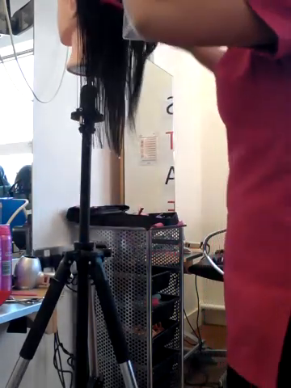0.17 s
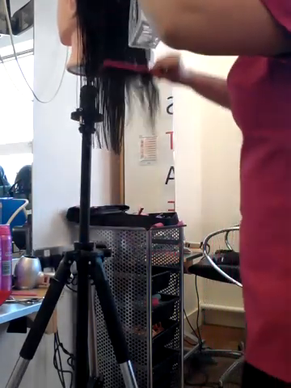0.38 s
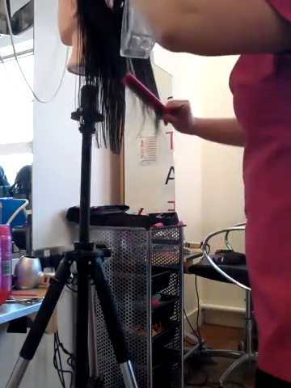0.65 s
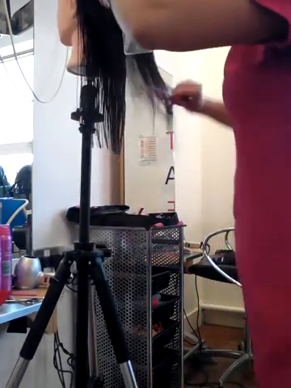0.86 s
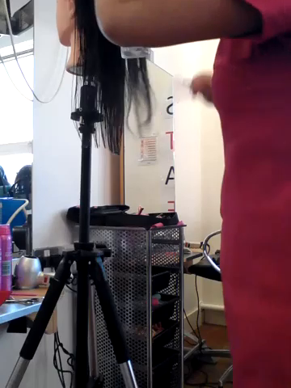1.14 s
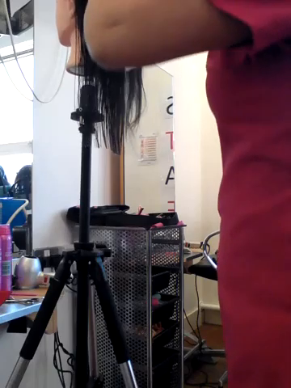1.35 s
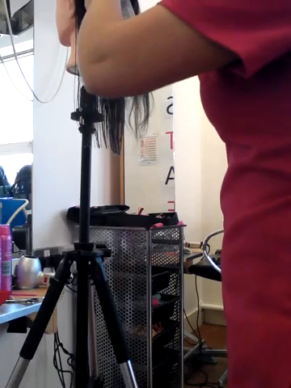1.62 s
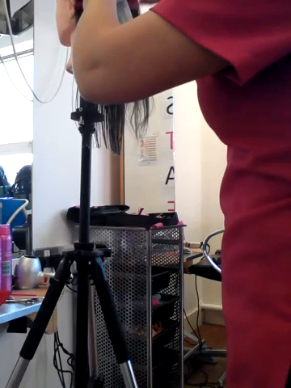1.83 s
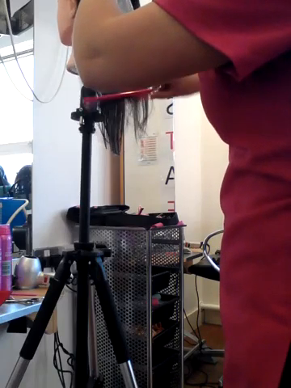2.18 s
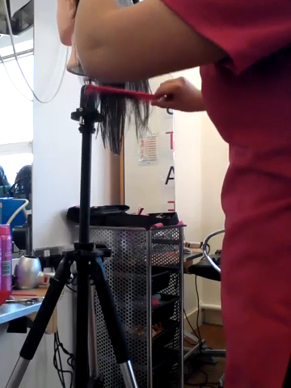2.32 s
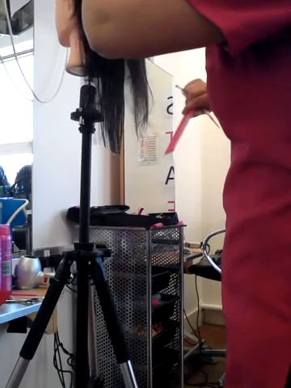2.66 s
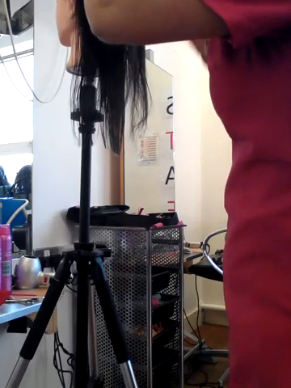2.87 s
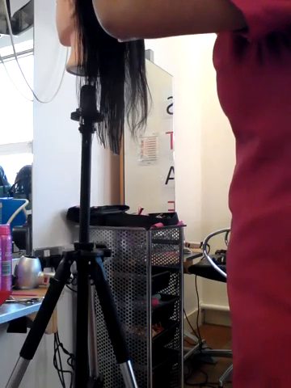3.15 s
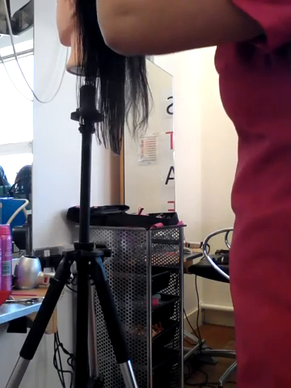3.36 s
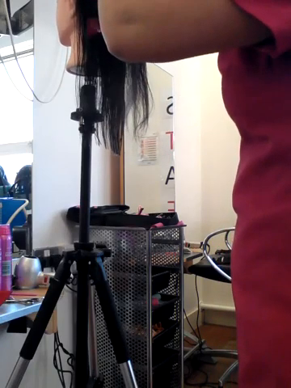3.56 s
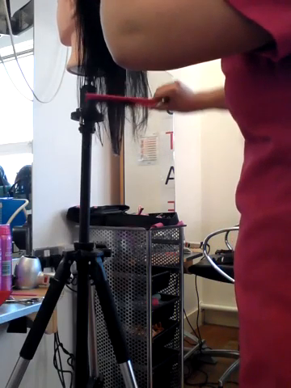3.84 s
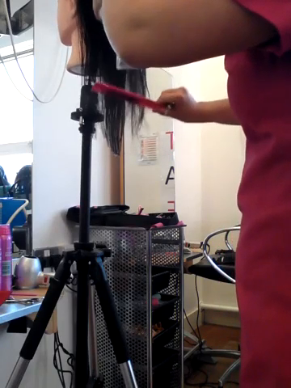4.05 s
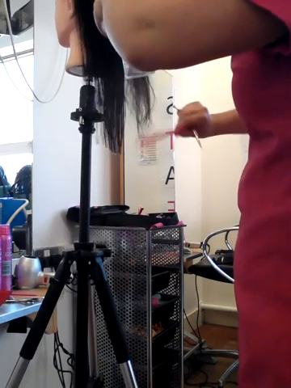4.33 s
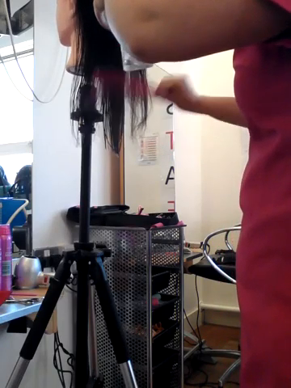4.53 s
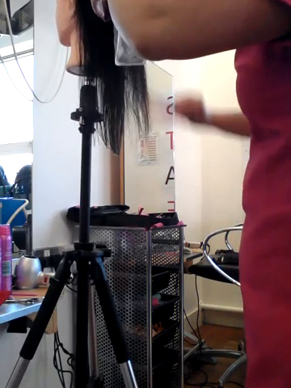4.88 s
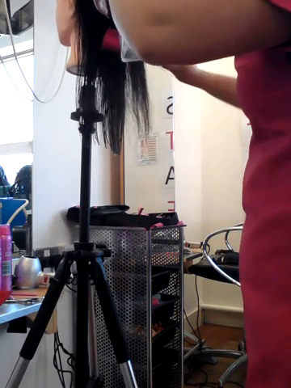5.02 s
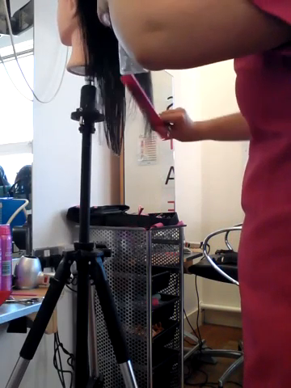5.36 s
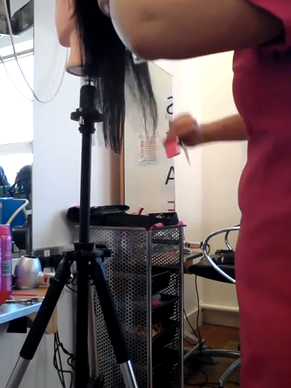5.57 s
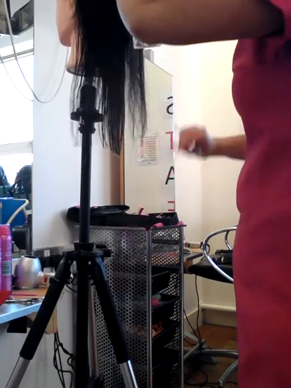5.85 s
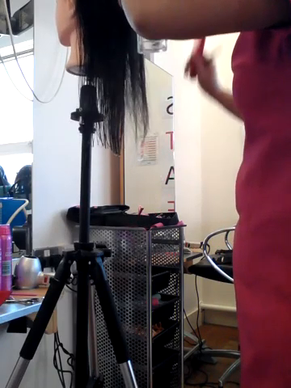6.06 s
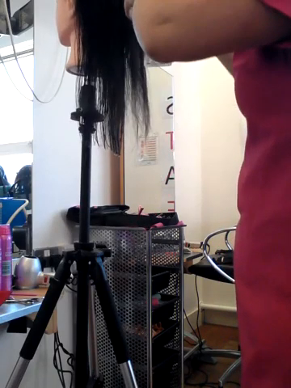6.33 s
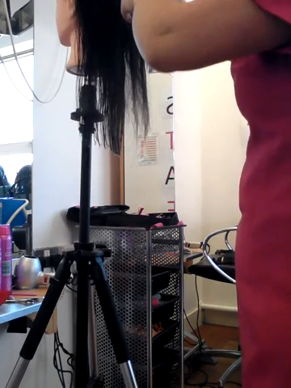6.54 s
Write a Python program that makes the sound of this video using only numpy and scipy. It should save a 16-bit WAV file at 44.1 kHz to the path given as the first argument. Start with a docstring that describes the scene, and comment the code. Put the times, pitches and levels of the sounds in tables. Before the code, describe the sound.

In a hard-walled classroom, a tap-like hiss runs over a low room rumble. A trigger spray bottle gives three short wet squirts, pauses, then three more with small plastic ticks. Dull thuds sound further off, then a loud hard clack with fluttering echoes and a softer clack. Four last squirts follow. One small microphone with faint noise of its own.

```python
"""First comes a tap-like hiss over a rumbling room, strong at the start and wavering later: shaped noise.
Soon a trigger spray bottle wets long hair in a hard-walled classroom, three or four squirts at a time.
The squirts are bursts of jet noise; small trigger ticks are short clicks ringing like hard plastic.
Further off, something set down gives dull thuds of low noise, and a hard object clacks twice, with
quick flutter echoes after the first loud clack. One small microphone adds its own noise, and decaying
noise patterns make the room's echoes."""
import sys
import numpy as np
from scipy import signal
from scipy.fft import rfft, irfft
from scipy.io import wavfile

SR = 44100
rng = np.random.default_rng(int(sys.argv[2]) if len(sys.argv) > 2 else 0)


def wav_record(signal):
    """Record a signal, one row per channel, as 16-bit PCM in the file named by sys.argv[1]."""
    frames = np.transpose(np.atleast_2d(signal))
    bounded = np.clip(frames, -1, 1)
    # unit amplitude maps onto the largest positive 16-bit level
    quanta = np.round(bounded * 32767).astype(np.int16)
    wavfile.write(sys.argv[1], SR, quanta)


N = 295469
T = np.arange(N) / SR
HZ = np.maximum(np.arange(N // 2 + 1) * SR / N, 5)   # kept above 0 for the log axis


def from_db(db):
    """Turns decibels into gain."""
    return 10 ** (np.asarray(db) / 20)


def rms_one(x):
    """Scales a sound to an rms of 1."""
    return x / np.sqrt(np.mean(x ** 2) + 1e-20)


def at_hz(points, hz):
    """Reads a curve of (frequency [Hz], level [dB]) on a log-frequency axis."""
    points_hz, points_db = np.transpose(points)
    return np.interp(np.log(hz), np.log(points_hz), points_db)


def band(x, low_hz, high_hz):
    """Lets through only one band of pitches: a second-order band-pass."""
    edges = [low_hz, min(high_hz, .45 * SR)]
    return signal.sosfilt(signal.butter(2, edges, "band", fs=SR, output="sos"), x)


def noise(gain):
    """Makes random noise with the given gain at each frequency; rms 1."""
    return rms_one(irfft(rfft(rng.standard_normal(N)) * gain, N))


def drift(rate):
    """Makes a random wander, smoothed so that it is weak above about rate [Hz]; rms 1."""
    step = 40   # samples between computed points
    pole = np.exp(-2 * np.pi * rate * step / SR)
    steps = rng.standard_normal(N // step + 2002)
    slow = signal.lfilter([1], [1, -2 * pole, pole * pole], steps)[2000:]   # skip the filter's start
    return np.interp(np.arange(N) / step, np.arange(len(slow)), rms_one(slow))


def patchy(spectrum, patchy_db, rate):
    """Makes coloured noise whose octaves flicker partly together, partly alone; rms 1."""
    together = drift(rate)
    colour = from_db(at_hz(spectrum, HZ))
    out = 0
    for centre in 30 * 2.0 ** np.arange(10):
        octave = np.cos(np.clip(np.log2(HZ / centre), -1, 1) * np.pi / 2) * colour
        flicker_db = patchy_db * (2.0 * together + drift(rate))
        out = out + irfft(rfft(rng.standard_normal(N)) * octave, N) * from_db(flicker_db)
    return rms_one(out)


def burst(swell, t60):
    """Shapes a level that swells smoothly to 1, then dies by 60 dB in t60 seconds."""
    swell, t60 = max(swell, 2e-4), max(t60, 2e-3)
    t = np.arange(int((swell + t60) * SR)) / SR
    rising = np.sin(np.pi / 2 * np.minimum(t / swell, 1)) ** 2
    return np.where(t < swell, rising, from_db(-60 * (t - swell) / t60))


def add(out, s, sound):
    """Mixes a sound in at time s [s]."""
    i = int(s * SR)
    out[i:i + len(sound)] += sound[:N - i]


# How long echoes take to die by 60 dB: (frequency [Hz], time [s])
ECHO_T60 = [(200, 0.61), (1400, 0.81), (3700, 0.93), (6000, 0.42), (8500, 0.21), (12000, 0.2)]
# How strongly echoes start: (frequency [Hz], level [dB])
ECHO_COLOUR = [(150, 11), (1400, 5.5), (2600, 2), (3700, 2), (5500, 9), (8000, 8), (14000, -10)]


def room():
    """Gives echo patterns: noise that builds up fast and dies at its own speed in each band."""
    t = T[:SR]
    centres = 60 * 2.0 ** np.arange(0, 8, .5)
    bands = []
    for hz in centres:
        half_octave = signal.butter(2, [hz, hz * np.sqrt(2)], "band", fs=SR, output="sos")
        bands.append(signal.sosfilt(half_octave, rng.standard_normal(2 * SR)))
    bands = np.array(bands)
    start_db = at_hz(ECHO_COLOUR, centres)[:, None]
    dying = from_db(start_db - 60 * t / at_hz(ECHO_T60, centres)[:, None])
    dying = dying * np.clip((t - .004) / 0.00043, 0, 1)   # the nearest wall answers after a few ms

    def echo():
        """Gives the pattern heard from another spot, by reading the noise from a random point."""
        tail = np.sum(bands[:, rng.integers(SR):][:, :SR] * dying, axis=0)
        return tail / np.sqrt(np.sum(tail ** 2))   # unit energy
    return echo


# Faint low hums: (start [s], end [s], first pitch [Hz], last pitch [Hz], middle rms level [dB])
HUM_GLIDES = [(4.2, 4.62, 212, 216, -53), (4.58, 5.25, 201, 204, -49.5), (4.25, 4.86, 260, 277, -52.5),
              (4.94, 5.5, 294, 301, -53), (4.943, 5.948, 169, 165, -55), (5.33, 5.9, 243, 248, -53),
              (4.4, 4.85, 605, 592, -58), (4.95, 5.3, 482, 492, -57), (5.7, 6.12, 482, 490, -57),
              (5.55, 5.95, 550, 552, -58)]


def hums():
    """Unsteady low sine tones that fade in, glide a little and fade out."""
    out = np.zeros(N)
    for start, end, first_hz, last_hz, db in HUM_GLIDES:
        along = np.clip((T - start) / (end - start), 0, 1)
        pitch = first_hz + (last_hz - first_hz) * along + .6 * drift(2)
        fade = np.sqrt(2 * np.minimum(2 * np.sin(np.pi * along), 1))
        tone = np.sin(2 * np.pi * np.cumsum(pitch) / SR)
        out += from_db(db + 0.49 * drift(3.7)) * fade * tone
    return out


# Background levels before the low cut: (time [s], hiss [dB], murmur of the room [dB], drone [dB])
BACKGROUND_LEVELS = [(0, -43.5, -51, -60), (.06, -40, -48, -64), (.23, -43, -52, -55),
                     (.39, -43, -51.5, -63), (.65, -41, -49, -60), (.78, -41.5, -49, -54),
                     (.88, -43.5, -50, -58), (1.1, -42, -51, -62.5), (1.5, -48.5, -51.5, -61.5),
                     (1.69, -49.5, -53.5, -58), (1.749, -64, -53.5, -62), (2.328, -56, -53, -56.5),
                     (2.95, -43.5, -47.5, -53), (3.26, -50.5, -48.5, -53.5), (3.5, -50.5, -44.5, -38),
                     (3.68, -56.5, -45, -44), (3.95, -63.5, -50, -50.5), (4.2, -64, -41.5, -49),
                     (4.6, -56.5, -50.5, -49.5), (5.06, -52, -47, -46), (5.3, -61, -47.5, -48),
                     (5.65, -48.5, -47, -48.5), (6.25, -48, -48, -50), (6.7, -44.5, -49, -49)]
# Colour of the far hiss: (frequency [Hz], level [dB per Hz])
HISS_COLOUR = [(710, -22), (1200, -11), (1610, -2.5), (2100, -4.5), (2360, 0), (3340, -1), (4220, 7.5),
               (5730, -4.5), (8000, -10.5), (13400, -23), (15000, -47)]
# Colour of the room's murmur: (frequency [Hz], level [dB per Hz])
MURMUR_COLOUR = [(150, -11.5), (250, -7), (301, -6), (425, -7.5), (467, -6.5), (599, -5.5), (1010, -12.5),
                 (1460, -11.5), (3000, -26), (3900, -24), (6600, -120)]
# Colour of the drone before its peaks: (frequency [Hz], level [dB per Hz])
DRONE_COLOUR = [(74, -51), (125, -1), (153, 0), (204, -0.5), (242, 3.5), (286, -9), (329, -2), (400, -9.5),
                (520, -38), (880, -120)]
# Room modes added to the drone: (frequency [Hz], width [Hz], level [dB])
DRONE_MODES = [(162, 39, -3.5), (206.3, 17, 3.5), (262, 33, -20), (360, 22, -3)]
# Deepest rumble: (time [s], level [dB])
DEEP_LEVELS = [(0, -98), (.6, -92), (.75, -80), (.95, -95), (2.0, -92), (2.2, -76), (2.6, -92), (2.87, -80),
               (3.2, -92), (3.5, -78), (4.2, -73), (5.4, -67), (6.7, -74)]
# Colour of the microphone's own noise: (frequency [Hz], level [dB per Hz])
SELF_NOISE_COLOUR = [(20, 17), (40, -23), (65, -30), (110, -30), (300, -28), (8000, 0.5), (15000, -1.5)]
SELF_NOISE_DB = -64.5   # overall rms


def background():
    """Shaped noises make far hiss, murmur, drone and microphone noise; hums swell later on."""
    s, hiss_db, murmur_db, drone_db = np.transpose(BACKGROUND_LEVELS)
    hiss = from_db(np.interp(T, s, hiss_db)) * patchy(HISS_COLOUR, patchy_db=.6, rate=12)
    murmur = from_db(np.interp(T, s, murmur_db)) * patchy(MURMUR_COLOUR, patchy_db=.8, rate=5.0)
    modes = 1 + sum(from_db(db) / (1 + ((HZ - hz) / width * 2) ** 2) for hz, width, db in DRONE_MODES)
    drone_gain = from_db(np.interp(T, s, drone_db) + 0.2 * drift(3.2))
    drone = drone_gain * noise(from_db(at_hz(DRONE_COLOUR, HZ)) * modes)
    low_noise = band(band(rng.standard_normal(N), 65, 116), 65, 116)
    deep = from_db(np.interp(T, *np.transpose(DEEP_LEVELS))) * rms_one(low_noise)
    own_noise = from_db(SELF_NOISE_DB) * noise(from_db(at_hz(SELF_NOISE_COLOUR, HZ)))
    low_cut = band(band(hiss + murmur + drone, 170, 20000), 170, 20000)
    return low_cut + hums() + deep + own_noise


# Dull far thuds: (time [s], boom [dB], body [dB], rustle [dB], t60 before the parts' shares [s],
# centre of the body [Hz])
FAR_THUDS = [(2.016, -42.5, -42, -51, 0.64, 940), (2.356, -50, -71, -80, 0.63, 900),
             (2.556, -52, -56, -70, 0.096, 900), (2.634, -54.5, -70, -64, 1, 900),
             (2.916, -41.5, -40.5, -67, 0.5, 940), (3.010, -46, -46, -50, 0.11, 1100),
             (3.416, -47.5, -43.5, -43.5, 0.63, 1190), (3.453, -39.5, -30, -37, 0.58, 1280),
             (3.480, -40.5, -39.5, -52, 0.4, 754), (3.521, -38.5, -37.5, -57, 0.32, 1170),
             (3.999, -36.5, -33.5, -44, 0.63, 970), (4.018, -44.5, -38, -48, 0.33, 700),
             (4.055, -44, -39, -41.5, 0.55, 905), (4.389, -52, -48, -59, 0.22, 1010)]
# Boom, body and rustle of a thud, one row each: (delay [s], swell [s], share of the t60 [ratio])
BOOM_BODY_RUSTLE = [(0.00803, 0.015, 0.75), (0.000996, 0.0019, 1.06), (0.0017, 0.019, 1.8)]
BOOM_HZ, RUSTLE_HZ = (183, 615), (1930, 4660)
BODY_SPREAD = 1.48   # the body reaches this factor below and above its centre
THUD_LUMPS_DB, THUD_LUMPS_HZ = 2.0, 45   # a thud comes down unevenly


def thuds():
    """Soft heavy contacts: a late boom, a body and a rustle, each noise with a weak skirt above."""
    out = np.zeros(N)
    for s, *levels_db, t60, body_hz in FAR_THUDS:
        edges = BOOM_HZ, (body_hz / BODY_SPREAD, body_hz * BODY_SPREAD), RUSTLE_HZ
        for db, (low_hz, high_hz), (delay, swell, share) in zip(levels_db, edges, BOOM_BODY_RUSTLE):
            white = rng.standard_normal(SR)
            skirt = from_db(-22) * rms_one(band(white, high_hz, high_hz + 3000))
            shudder = rms_one(band(white, low_hz, high_hz)) + skirt
            shape = burst(swell, min(share * t60, .7))
            add(out, s + delay, from_db(db) * shape * shudder[SR // 10:][:len(shape)])
    return out * from_db(THUD_LUMPS_DB * drift(THUD_LUMPS_HZ))


# Ticks and clacks of hard plastic, with quick flutter echoes after the first loud clack,
# before the microphone's colour: (time [s], level at the onset [dB], low edge [Hz], high edge [Hz])
CLACKS_AND_FLUTTER = [(0.826, -39, 900, 9000), (2.373, -37, 3000, 14000), (2.689, -36, 3020, 13900),
                      (3.355, -29, 3560, 12100), (4.1455, -27, 497, 6400), (4.8859, -12.5, 1400, 9000),
                      (4.8874, -10.5, 3400, 5200), (4.890, -18, 2100, 3000), (4.8945, -21, 900, 6000),
                      (4.9008, -21, 3200, 4760), (4.9022, -23, 2500, 5000), (4.909, -26, 3000, 4800),
                      (4.921, -25, 1200, 4800), (4.928, -27, 3000, 4800), (4.934, -27, 3400, 4500),
                      (5.4208, -38, 3400, 5500), (5.4256, -25, 600, 9000), (5.4264, -22, 1500, 3100),
                      (5.4276, -22, 1300, 2200), (5.434, -25, 1600, 3200), (5.441, -29, 1300, 3200),
                      (5.728, -36.5, 1490, 8000), (6.598, -32, 1520, 14300)]
# Modes of the struck plastic: (frequency [Hz], level before the ringing gain [dB], t60 [s])
PLASTIC_MODES = [(700, -2, .04), (1050, -6, .03), (1530, 2, .05), (2030, 1, .05), (2450, 2, .05),
                 (2750, 0, .05), (3330, 0, .045), (3790, -2, .04), (3960, 1, .045), (4400, 0, .035),
                 (4810, -4, .035)]
RING_DB, RATTLE_DB, RATTLE_T60_S = -42, -21, 0.03   # ringing and rattle, against the bare crack
CLACK_WET_DB = -8   # level of the room echo of each row
ECHO_WIDER = 1.03   # that echo's band is this factor wider at each edge


def clacks(echo):
    """A sharp crack and brief rattle ring the plastic's modes; each row, clack or flutter, is band-passed."""
    out, t = np.zeros(N), T[:SR // 8]
    ringing = np.zeros(len(t))
    for hz, db, t60 in PLASTIC_MODES:
        ringing += from_db(RING_DB + db - 60 * t / t60) * np.sin(2 * np.pi * hz * t)
    ringing[0] = 1   # the bare crack
    click = 1. * (t == 0)
    shape = burst(.001, RATTLE_T60_S)
    energy = np.sum(shape ** 2)
    for s, db, low_hz, high_hz in CLACKS_AND_FLUTTER:
        force = from_db(RATTLE_DB) * rng.standard_normal(len(shape)) * shape
        force[SR // 2000] += 1   # the crack, half a millisecond in
        rung = band(signal.fftconvolve(force, ringing), low_hz, high_hz)
        add(out, s, from_db(db) * rung * np.sqrt(energy / np.sum(rung ** 2)))
        edges = low_hz / ECHO_WIDER, high_hz * ECHO_WIDER
        strength = np.sqrt(energy / np.sum(band(click, *edges) ** 2))
        add(out, s, from_db(db + CLACK_WET_DB) * strength * band(echo(), *edges))
    return out


# Brief whistles of the nozzle: (time [s], pitch [Hz], rms level at the top of the swell [dB])
NOZZLE_WHISTLES = [(1.000, 5940, -32), (1.287, 7400, -30), (1.305, 3830, -25), (2.417, 5640, -30),
                   (2.437, 5430, -28.5), (2.448, 4700, -29.5), (2.754, 5630, -42), (3.089, 6560, -36),
                   (5.566, 4370, -30), (5.598, 4300, -33), (5.615, 4600, -33), (5.885, 5240, -31.5),
                   (6.182, 5250, -29), (6.189, 4280, -29), (6.206, 6300, -33), (6.212, 4050, -34)]
WHISTLE_WIDTH = 0.13   # share of the pitch
WHISTLE_SWELL_S, WHISTLE_T60_S = 0.0057, 0.1


def whistles():
    """Narrow noise where the jet briefly sings at one pitch."""
    out, shape = np.zeros(N), burst(WHISTLE_SWELL_S, WHISTLE_T60_S)
    for s, hz, db in NOZZLE_WHISTLES:
        half = hz * WHISTLE_WIDTH / 2
        narrow = rms_one(band(rng.standard_normal(SR // 2), hz - half, hz + half))
        add(out, s, from_db(db) * shape * narrow[:len(shape)])
    return out


# Pulls of the trigger: (valve opens [s], seep before it [s], build-up to the surge [s], seep [dB],
# jet [dB], surge [dB], treble over body before each stage's offset [dB],
# pump whistle over body in the surge [dB])
TRIGGER_PULLS = [(0.926, 0.021, 0.079, -46, -38, -32, -8.5, -8),
                 (1.245, 0.011, 0.06, -40, -34, -32, -8, -11),
                 (1.497, 0.019, 0.036, -48, -43, -38, -2.5, -7),
                 (2.403, .03, 0.051, -71.5, -35.5, -31, -6.5, 1),
                 (2.754, 0.07, 0.075, -38.5, -33.5, -42.5, -2.5, -3.5),
                 (3.084, 0.082, .026, -41.5, -32.5, -48, -5.5, -16),
                 (5.561, 0.113, 0.059, -41.5, -33, -38.5, -8, -3),
                 (5.878, 0.063, 0.025, -39.5, -33, -40, 0, 6),
                 (6.175, 0.086, 0.038, -41, -31.5, -36.5, -3.5, -7),
                 (6.358, 0.023, 0.074, -48, -39, -33.5, -7.5, -15)]
# Air bubbles spitting through the nozzle in short pops: (time [s], peak level [dB])
BUBBLE_SPITS = [(0.942, -36), (0.969, -34), (1.017, -31), (1.308, -32), (1.498, -38), (1.525, -43),
                (1.549, -34), (1.565, -35), (1.579, -33), (2.405, -39), (2.448, -34), (2.755, -32),
                (2.802, -29), (3.074, -34.5), (3.113, -30.5), (5.599, -33), (5.887, -34.5), (5.896, -34),
                (6.179, -33), (6.217, -30.5), (6.424, -47)]
# Stray drops between pulls: (time [s], peak level [dB])
STRAY_DROPS = [(1.600, -40.5), (1.671, -58), (1.799, -50.5), (1.865, -54.5), (2.278, -52), (2.970, -45)]
SEEP_START_DB = -3   # a seep's first burst, against its top
SEEP_T60_S, SEEP_TREBLE_DB = 0.14, -3.5
JET_SWELL_S, JET_T60_S, JET_TREBLE_DB = 0.0073, 0.22, 2
SURGE_SWELL_S, SURGE_T60_S, SURGE_TREBLE_DB = 0.062, 0.23, 2   # longest swell of a surge
EARLY_WHISTLE_DB = -7   # the pump whistles less before the surge
SPIT_SWELL_S, SPIT_T60_S, SPIT_TREBLE_DB = 0.0029, 0.042, -4.5
DRIBBLE_T60_S, DRIBBLE_TREBLE_DB = 0.36, -7.5


def spurts():
    """A pull seeps, opens and surges; spits and drops follow their own lists.

    Rows: (time [s], peak [dB], swell [s], t60 [s], treble over body [dB], whistle over body [dB])."""
    for s, seep, build, seep_db, jet_db, surge_db, treble_db, whistle_db in TRIGGER_PULLS:
        swell = min(build, SURGE_SWELL_S)
        early_db = whistle_db + EARLY_WHISTLE_DB
        seep_treble_db = treble_db + SEEP_TREBLE_DB
        yield s - seep, seep_db + SEEP_START_DB, JET_SWELL_S, SEEP_T60_S, seep_treble_db, early_db
        yield s - seep, seep_db, seep, SEEP_T60_S, seep_treble_db, early_db
        yield s, jet_db, JET_SWELL_S, JET_T60_S, treble_db + JET_TREBLE_DB, early_db
        yield s + build - swell, surge_db, swell, SURGE_T60_S, treble_db + SURGE_TREBLE_DB, whistle_db
    for s, db in BUBBLE_SPITS:
        yield s - SPIT_SWELL_S / 2, db, SPIT_SWELL_S, SPIT_T60_S, SPIT_TREBLE_DB, -15
    for s, db in STRAY_DROPS:
        yield s, db, JET_SWELL_S, DRIBBLE_T60_S, DRIBBLE_TREBLE_DB, -15


# Colour of the spray jet: (frequency [Hz], level [dB per Hz])
JET_COLOUR = [(700, -26), (1200, -14), (2000, -9.5), (3000, -6.5), (3800, 1), (4600, 2.5), (5600, -3),
              (7000, -5.5), (10000, -10), (15000, -14)]
TREBLE_HZ = 6400   # body below, treble above
PUMP_HZ, PUMP_WIDTH_HZ = 2340, 320
SPUTTER_DB, SPUTTER_HZ = 1.0, 35   # air in the tube makes the whole jet stutter
GRAIN_DB, GRAIN_HZ = 1.6, 200   # droplets make each part grainy


def spray():
    """Turbulent jet noise in three parts: body, fizzing treble and the pump's whistle."""
    colour = from_db(at_hz(JET_COLOUR, HZ))
    body_noise = noise(colour / np.sqrt(1 + (HZ / TREBLE_HZ) ** 6))
    treble_noise = noise(colour / np.sqrt(1 + (TREBLE_HZ / HZ) ** 6))
    pump_noise = noise(1 / (1 + ((HZ - PUMP_HZ) / PUMP_WIDTH_HZ * 2) ** 2))
    body_power, treble_power, pump_power = np.zeros((3, N))
    for s, db, swell, t60, treble_db, whistle_db in spurts():   # overlapping spurts add in power
        add(body_power, s, (from_db(db) * burst(swell, t60)) ** 2)
        add(treble_power, s, (from_db(db + treble_db) * burst(swell, 1.66 * t60)) ** 2)
        add(pump_power, s + swell / 2, (from_db(db + whistle_db) * burst(swell / 2, t60 / 4)) ** 2)
    stutter = from_db(SPUTTER_DB * drift(SPUTTER_HZ))

    def play(power, part):
        """Gives a noise its changing level, stutter and droplet grain."""
        return stutter * from_db(GRAIN_DB * drift(GRAIN_HZ)) * np.sqrt(power) * part
    jet = play(body_power, body_noise) + play(treble_power, treble_noise)
    return jet, play(pump_power, pump_noise)


# The microphone's colour for blows and echoes: (frequency [Hz], level [dB])
MICROPHONE_COLOUR = [(20, -30), (100, -13), (160, 3.5), (250, 8), (1500, 2), (2900, 1), (3950, 2),
                     (4900, -1.5), (5500, -2.5), (8000, -11), (15000, -19)]
SPRAY_WET_DB, PUMP_WET_DB, THUD_WET_DB = -8, -17, -13   # how much of each feeds the echoes


def scene():
    """Mixes all sources at one microphone and feeds both channels the same sound."""
    echo = room()
    soft = thuds()
    jet, pump = spray()
    jet = jet + whistles()
    sent = from_db(THUD_WET_DB) * soft + from_db(SPRAY_WET_DB) * jet + from_db(PUMP_WET_DB) * pump
    echoes = signal.fftconvolve(sent, echo())[:N]
    blows_and_echoes = clacks(echo) + soft + echoes
    coloured = irfft(rfft(blows_and_echoes) * from_db(at_hz(MICROPHONE_COLOUR, HZ)), N)
    return np.tile(jet + pump + coloured + background(), (2, 1))


CUTOFF_HZ = 15400   # 70 dB down from here up


def record(dry):
    """Rounds loud peaks gently, then cuts the top steeply."""
    rounded = 1.3 * np.tanh(dry / 1.3)
    return signal.sosfilt(signal.cheby2(14, 70, CUTOFF_HZ, fs=SR, output="sos"), rounded)


dry = scene()
out = record(dry)
wav_record(out)
```